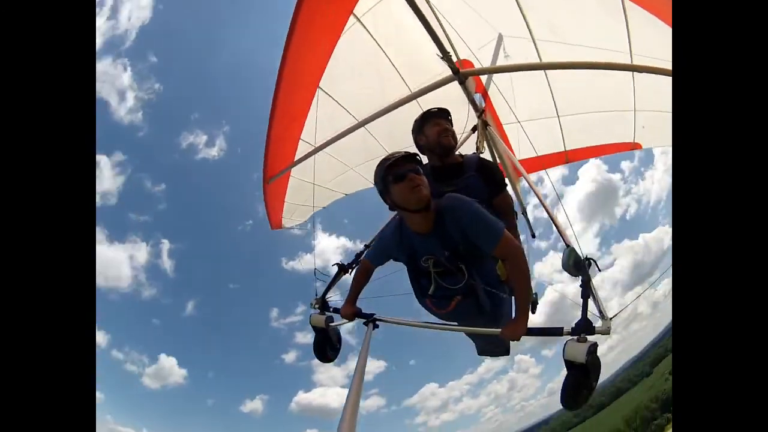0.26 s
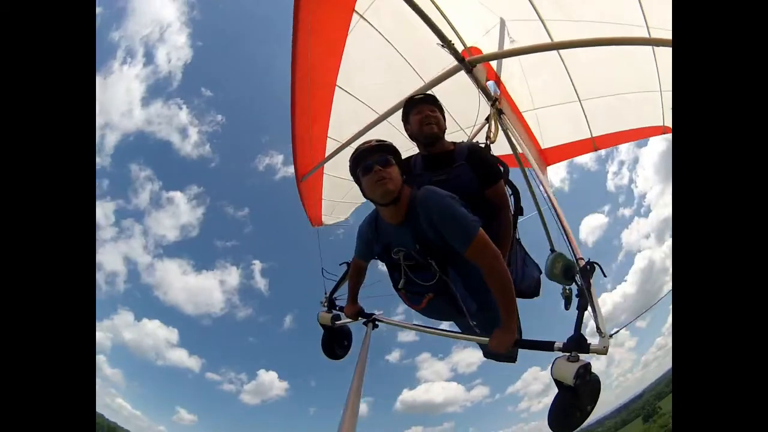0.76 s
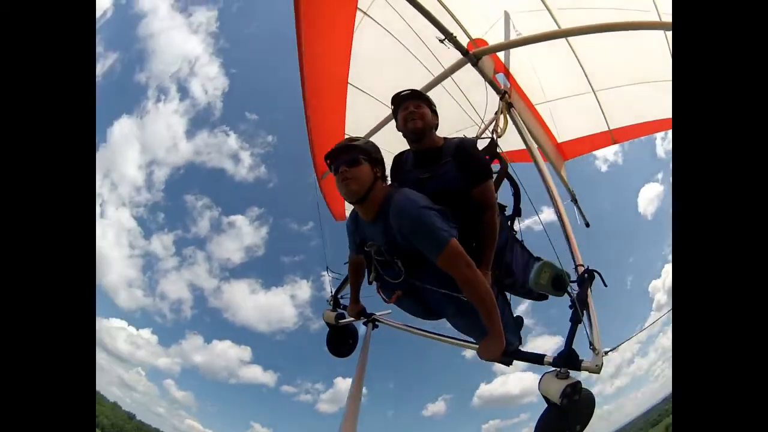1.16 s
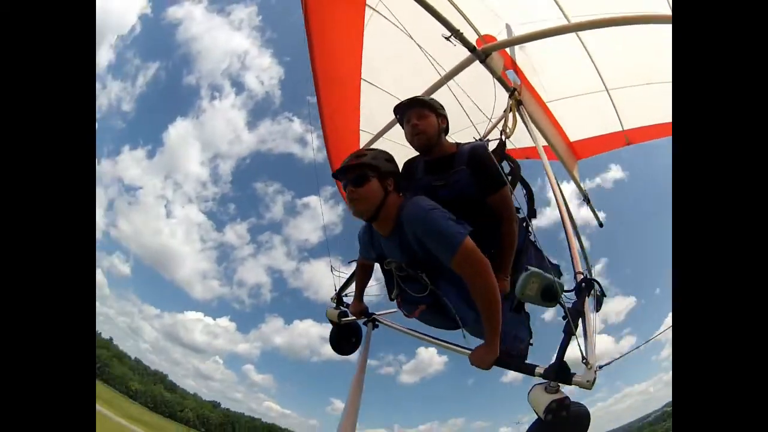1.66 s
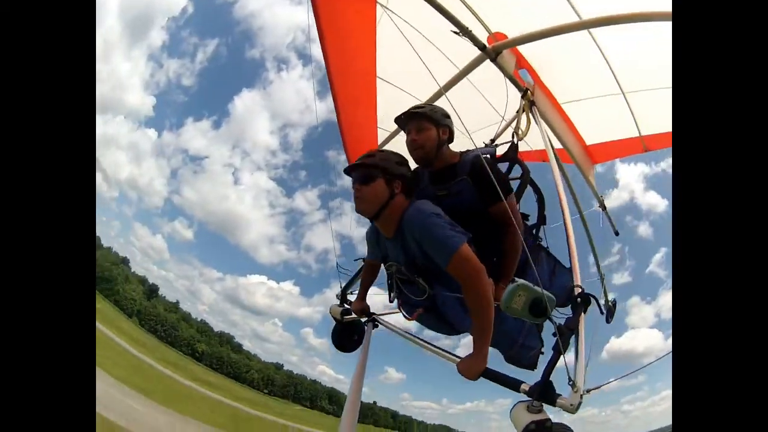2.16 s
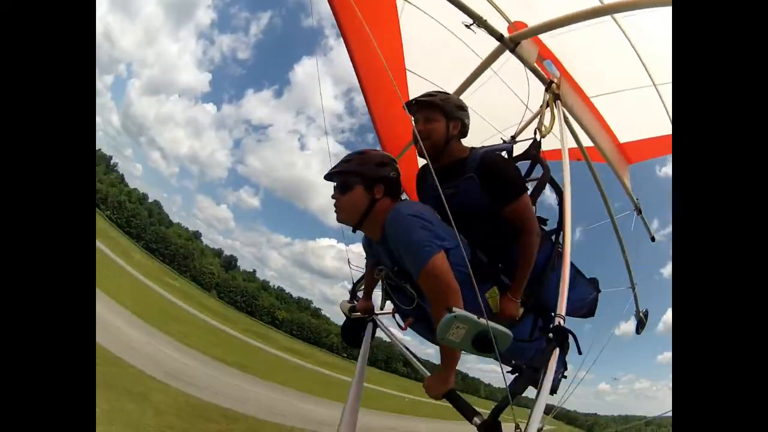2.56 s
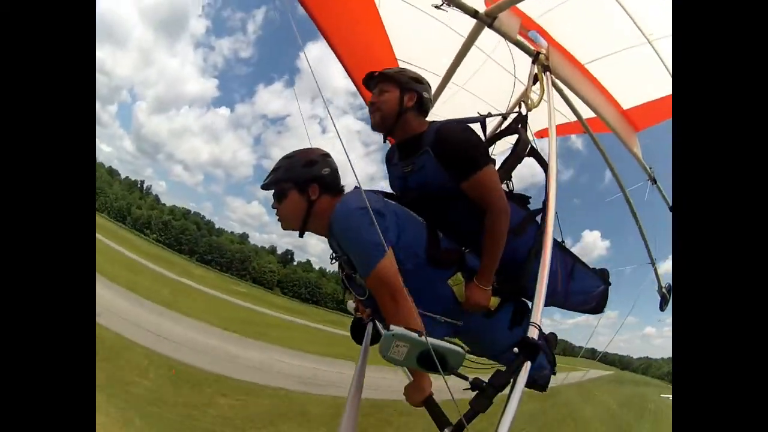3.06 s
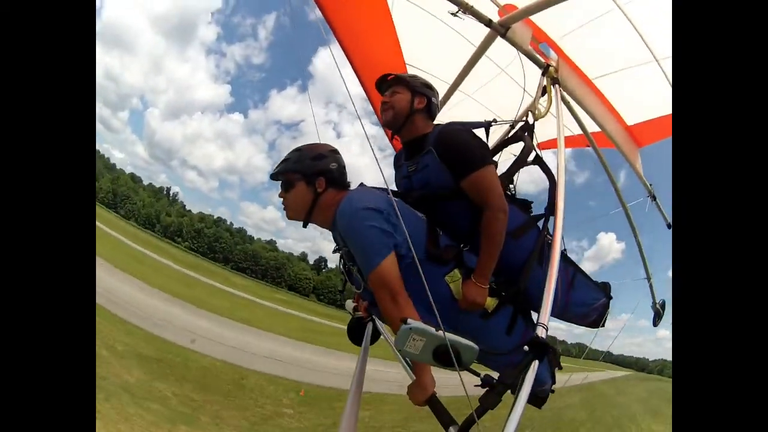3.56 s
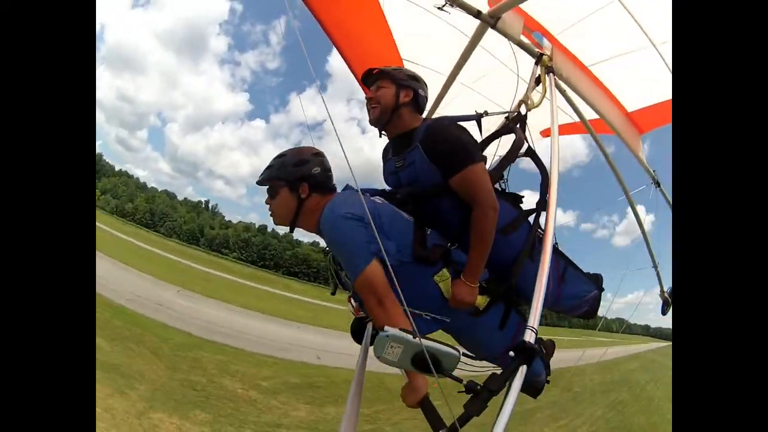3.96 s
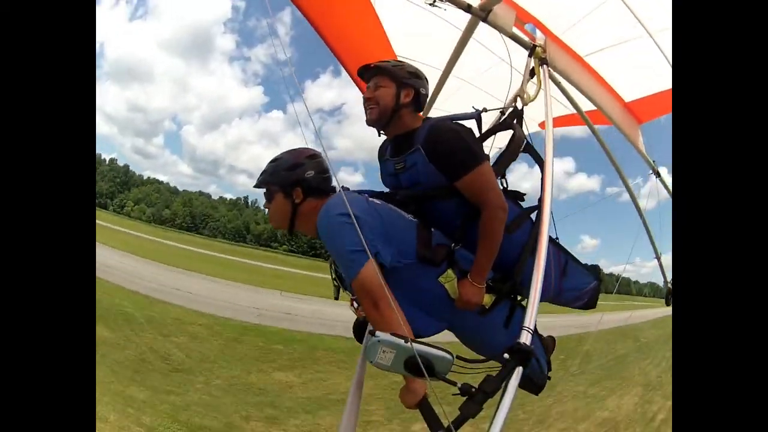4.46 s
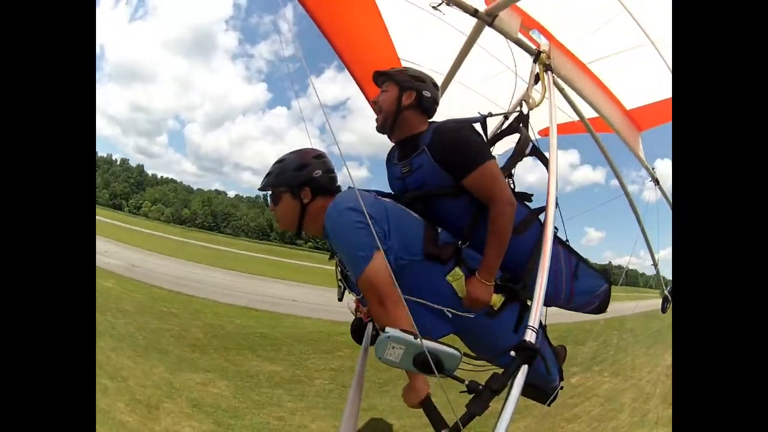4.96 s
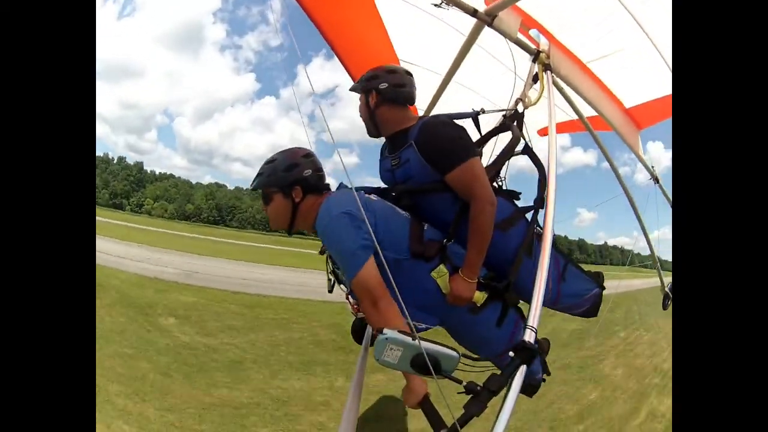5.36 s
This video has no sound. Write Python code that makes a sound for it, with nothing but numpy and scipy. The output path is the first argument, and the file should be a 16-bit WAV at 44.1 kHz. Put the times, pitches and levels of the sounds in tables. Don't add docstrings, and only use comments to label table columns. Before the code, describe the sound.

Wind noise fills the whole 5.6 seconds, captured in mono by a camera microphone inside a closed case on a hang glider descending over a grassy field. At first it is a dull, low rumble with little rush on top, sinking slightly until about 0.6 s, with a brief puff near 0.5 s. From 0.85 s the airflow strengthens, and a deep push lands around 1.3 s. Between 1.5 and 2 s the roar is fuller, with a heavier thump near 1.8 s. The deepest buffeting thins around 2.2 s while the rush keeps rising. From 3 to 5 s it is strongest: a rough, fluttering mid-low roar with quick puffs and a very faint airy fizz. A firm low knock comes at about 4.8 s, then the wind eases slightly, still blowing at the cut. Extremely faint hiss and a thin high electronic whine lie beneath.

```python
import sys
import numpy as np
from scipy import signal
from scipy.fft import rfft, irfft
from scipy.io import wavfile
from scipy.ndimage import uniform_filter1d

SR = 44100
rng = np.random.default_rng(int(sys.argv[2]) if len(sys.argv) > 2 else 0)


def unload_audio(sound):
    columns = np.transpose(np.atleast_2d(sound))
    steps = np.round(np.clip(columns, -1, 1) * 32767)
    wavfile.write(sys.argv[1], SR, steps.astype(np.int16))


def gain_from_db(level_db):
    decades = np.asarray(level_db, float) / 20
    return 10 ** decades


N = 246959


def flight():
    # start_s, speed_db (flow noise over the start), cross (flow over the port) [0-1]
    path = [(0, -0.4, 0.2), (.25, -1.5, 0.12), (.62, -2.5, 0.07), (.85, 1, 0.6), (1.1, 3.5, 0.7),
            (1.3, 3, .7), (1.55, 4.5, 0.99), (1.95, 4, .95), (2.15, 5.5, 0.6), (2.4, 7.5, 0),
            (2.8, 7, 0.18), (3.1, 9, 0.76), (3.45, 9, 0.8), (3.65, 9.5, 0.43), (4.05, 9, 0.31),
            (4.25, 9.5, 0.67), (4.8, 10, 0.52), (5.6, 6.5, 0.63)]
    s, speed_db, cross = np.transpose(path)
    t = np.arange(N) / SR
    return t, np.interp(t, s, speed_db), np.interp(t, s, cross)


def evened(x):
    return x / np.sqrt(np.mean(x ** 2) + 1e-20)


def read(points, hz):
    f, value = np.transpose(points)
    return np.interp(np.log(hz + 1), np.log(f + 1), value)


def wander(lo_hz, hi_hz):
    hz = np.fft.rfftfreq(N, 1 / SR)
    shape = hz / (hz + lo_hz) / np.sqrt(hz + lo_hz) / (1 + (hz / hi_hz) ** 4)
    return evened(irfft(shape * rfft(rng.standard_normal(N)), N))


def eddies(colour, patchy_db, pitch):
    frames, hz = N // 512 + 6, np.fft.rfftfreq(2048, 1 / SR)
    a, b, patches = rng.standard_normal((frames, 1025, 3)).T
    patches = uniform_filter1d(patches, size=24, axis=0)
    patches = evened(uniform_filter1d(patches, size=4, axis=1))
    slide = np.interp(np.arange(frames) * 512, np.arange(N), pitch * np.ones(N))
    gain = gain_from_db(read(colour, hz[:, None] / slide))
    gain = gain / np.linalg.norm(gain, axis=0)
    z = (a + 1j * b) * gain * gain_from_db(patchy_db * patches)
    return evened(signal.istft(z, nperseg=2048, noverlap=1536)[1][:N])


def bumps(t, rows):
    return sum(db * np.exp(-((t - s) / (length / 2)) ** 2) for s, db, length in rows)


def turbulence(colour, level_db, pitch, unrest, shared):
    gust, flutter, flicker = shared
    gust_db, flutter_db, flicker_db, patchy_db = unrest
    own = wander(40, 350)
    quick = .65 * flicker + .75 * own
    shake = gain_from_db(gust_db * gust + flutter_db * flutter + flicker_db * quick)
    return gain_from_db(level_db) * evened(shake * eddies(colour, patchy_db, pitch))


def followed(follow, speed_db, cross):
    start_db, per_db, full_cross_db = follow
    return start_db + per_db * speed_db + full_cross_db * cross


def buffet(follow, unrest, shared):
    # pitch_hz, level_db (per Hz)
    colour = [(10, -37), (22, -8.5), (45, -6), (85, -0.5), (130, -5.5), (200, -12), (400, -46), (900, -92),
              (2500, -120)]
    # centre_s, level_db, length_s
    thumps = [(0.367, -3, .08), (.7, 3, .08), (0.974, -5, .06), (1.278, -4, .08), (1.424, 3.5, 0.17),
              (1.58, 3, 0.17), (1.84, 7, 0.12), (2.207, -6.5, 0.9), (2.12, 6, .08), (2.216, -5, .06),
              (2.294, 7, .08), (2.468, -6, 0.09), (2.627, 1.5, .06), (2.74, 5, 0.09), (3.16, 4, 0.16),
              (3.294, -1, 0.097), (3.87, -5, .06), (4.246, 3.5, 0.093), (4.386, 4.5, 0.12),
              (4.523, -1, 0.092), (4.6, -2, 0.17), (5.046, 4, 0.077), (5.358, -9, .079), (5.52, 4, .1)]
    t, speed_db, cross = flight()
    level_db = followed(follow, speed_db, cross) + bumps(t, thumps)
    return turbulence(colour, level_db, 0.82 + .3 * cross, unrest, shared)


def roar(follow, unrest, shared):
    # pitch_hz, level_db (per Hz)
    colour = [(50, -43.5), (100, -4), (160, -0.5), (250, -1.5), (330, -3), (450, -8), (700, -18),
              (1500, -43.5), (4000, -110)]
    # centre_s, level_db, length_s
    surges = [(.03, -1.5, .08), (.62, -2.5, 0.098), (1.4, -0.5, 0.093), (1.753, 0.5, 0.13), (1.883, 2, .08),
              (2.325, -1.5, 0.086), (2.625, 0.5, 0.09), (2.93, 0, 0.13), (3.328, 3, 0.3),
              (3.66, -0.5, 0.18), (4.245, 1, 0.18), (4.403, 1, .15), (4.63, -3, 0.072), (4.803, 3.5, 0.13),
              (5.007, -4, 0.051), (5.084, 3.5, 0.036), (5.305, -1, 0.046), (5.385, -3.5, 0.056)]
    t, speed_db, cross = flight()
    level_db = followed(follow, speed_db, cross) + bumps(t, surges)
    return turbulence(colour, level_db, 0.72 + 0.46 * cross, unrest, shared)


def fizz(follow, unrest, shared):
    # pitch_hz, level_db (per Hz)
    colour = [(1500, -30), (3200, -1), (4000, .5), (5600, -1), (6200, -4), (7000, -5.5), (7700, -8.5),
              (8500, -11), (10200, -12), (11000, -16), (11600, -20), (12500, -28), (16000, -50)]
    # centre_s, level_db, length_s
    spits = [(2.64, 2, .03), (2.705, -3, .04), (3.05, 1, .03), (3.218, 1, .01), (3.52, 2, .02),
             (4.07, -2, .05), (4.12, 3, .04), (4.282, 3, .01), (4.35, -1.5, .12), (4.805, 4, .004),
             (4.87, 2, .03), (4.97, 4, .008), (5.0, -1, .015), (5.15, 2, .02), (5.228, 3.5, .02),
             (5.31, 1, .03), (5.45, 0, .1)]
    t, speed_db, cross = flight()
    level_db = followed(follow, speed_db, cross) + bumps(t, spits)
    return turbulence(colour, level_db, 1, unrest, shared)


def puffs(t):
    # start_s, level_db
    arrivals = [(.237, -3), (.533, 12), (.66, 1), (.715, 0), (.856, 6), (.878, 3), (.992, 1), (1.062, 0.5),
                (1.27, 1), (1.314, 3.5), (1.47, 3), (1.548, -3), (1.584, -2), (1.655, 5), (1.83, -1),
                (1.981, 2), (3.071, 3.5), (3.129, 7), (3.238, 3), (3.319, 0), (3.861, -1), (3.893, 2.5),
                (4.238, 0), (4.386, -3), (4.415, 2.5), (4.516, 2.5), (4.597, 6), (4.795, 5.5), (4.874, 3.5),
                (4.939, 4), (5.527, 2.5), (5.566, 0.5)]
    rise_s, decay_s = 0.0015, 0.0058
    level_db = np.zeros(N)
    for s, db in arrivals:
        rise = np.clip((t - s) / rise_s + 1, 0, 1)
        level_db += db * rise * np.exp(-np.maximum(t - s, 0) / decay_s)
    return level_db


def rush(follow, unrest, shared):
    # pitch_hz, level_db (per Hz)
    colour = [(200, -29), (400, -3), (600, 0), (1000, -5.5), (1600, -13.5), (2300, -20.5), (2800, -28.5),
              (3300, -36), (4200, -51), (7000, -100)]
    t, speed_db, cross = flight()
    knee_db = 12
    limited_db = knee_db * np.tanh(speed_db / knee_db)
    level_db = followed(follow, limited_db, cross) + puffs(t)
    return turbulence(colour, level_db, 1.064 - .009 * speed_db, unrest, shared)


def wind():
    # level_db (at the start), per_db (dB per dB of airspeed), full_cross_db
    follow = [
        (-37, 0.2576, -1.5),
        (-36, 0.33, 2),
        (-54, 1.55, 3),
        (-85, 1.19, 1.1),
    ]
    # gust_db (slow), flutter_db, flicker_db (quick), patchy_db (own patches)
    unrest = [
        (.0, .1, .1, .2),
        (.1, .4, .8, .4),
        (.1, .8, 1.7, 1.0),
        (.4, .5, 1.6, 1.1),
    ]
    shared = wander(4, 13), wander(14, 45), wander(70, 350)
    layers = (buffet, roar, rush, fizz)
    return sum(layer(f, u, shared) for layer, f, u in zip(layers, follow, unrest))


def circuit():
    t, speed_db, _ = flight()
    whine_hz, whine_db, hiss_db = 10519.5, -100 + .2 * speed_db, -86
    whine = np.sqrt(2) * gain_from_db(whine_db) * np.sin(2 * np.pi * whine_hz * t)
    return whine + gain_from_db(hiss_db) * rng.standard_normal(N)


def seal():
    # pitch_hz, level_db (per Hz)
    colour = [(2200, -29), (3300, -2.5), (4300, -3), (5500, 0.5), (6100, -8.5), (7500, -24), (12000, -58.5)]
    return gain_from_db(-86) * eddies(colour, 1.2, 1)


def pushes():
    # centre_s, level_db (peak), pitch_hz
    blows = [
        (1.3, -24, 44),
        (0.058, -31, 56),
        (1.7, -25.5, 125),
        (4.834, -17, 250),
        (5.8, -16, 280),
    ]
    width_cycles = 0.51
    t = np.arange(N) / SR
    out = np.zeros(N)
    for s, db, hz in blows:
        swell = np.exp(-((t - s) * hz / width_cycles) ** 2)
        out += gain_from_db(db) * swell * np.sin(2 * np.pi * hz * (t - s))
    return out


def scene():
    return (wind() + circuit() + seal() + pushes())[None]


def low_pass(x):
    return signal.sosfilt(signal.butter(12, 15750, fs=SR, output="sos"), x)


def record(dry):
    top_hz, rounding_db, settle_s, close_s = 12750, -98.5, .004, .0005
    settle = np.minimum(np.arange(N) / (settle_s * SR) + .27, 1)
    remaining = np.minimum(np.arange(N)[::-1] / (close_s * SR), 1)
    close = .45 + .55 * np.sin(np.pi / 2 * remaining) ** 2
    edge = signal.firwin(1023, top_hz, window=("kaiser", 7), fs=SR)
    held = np.pad(dry * settle * close, ((0, 0), (511, 511)), "edge")
    limited = signal.oaconvolve(held, edge[None], "valid")
    return low_pass(limited + gain_from_db(rounding_db) * rng.standard_normal(N))


dry = scene()
out = record(dry)
unload_audio(out)
```